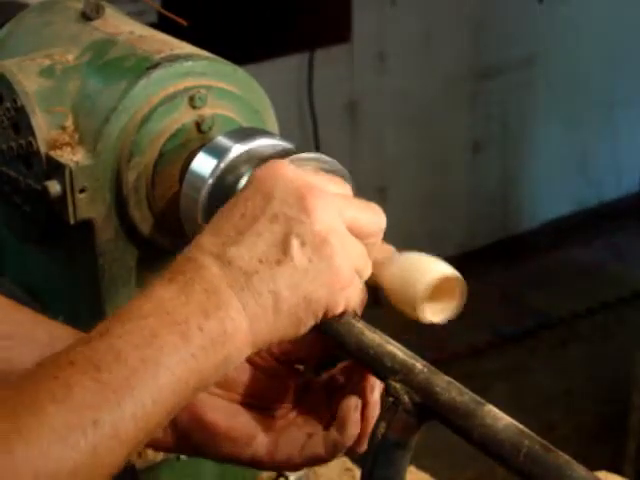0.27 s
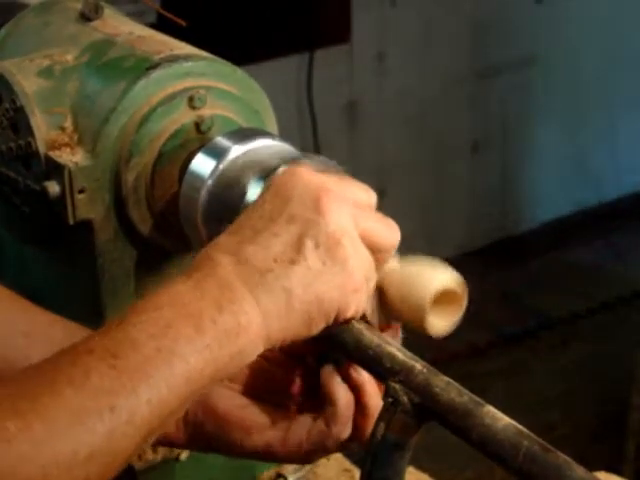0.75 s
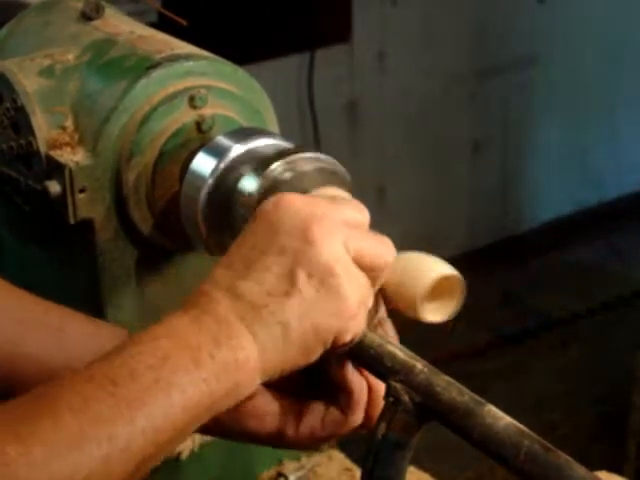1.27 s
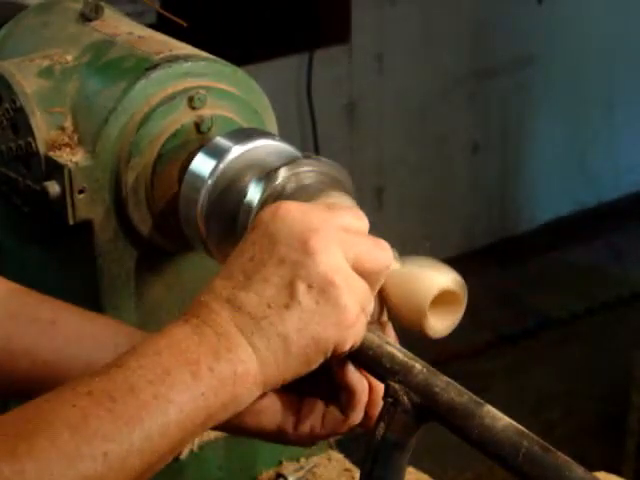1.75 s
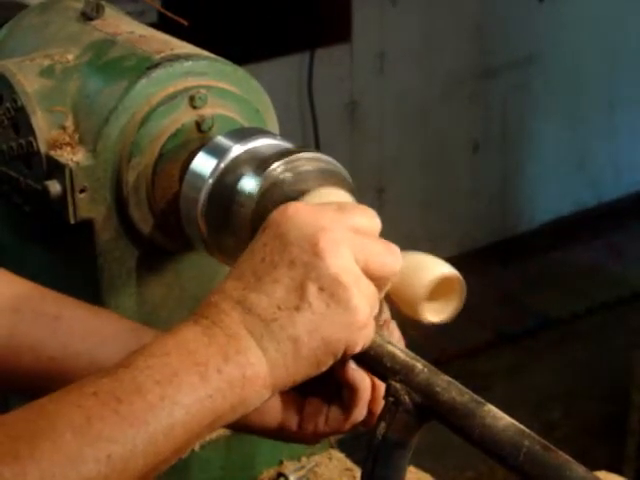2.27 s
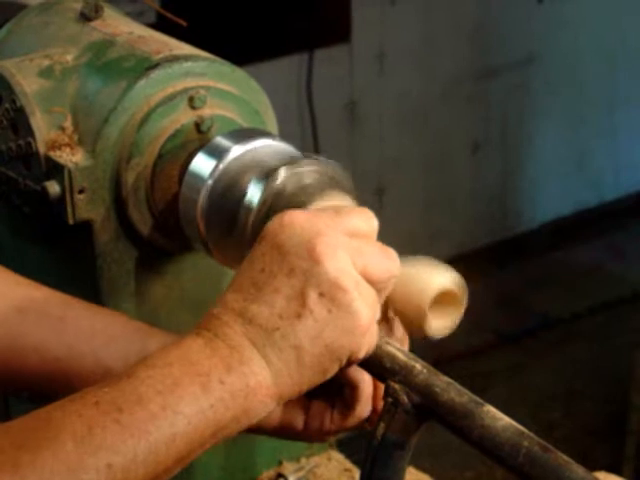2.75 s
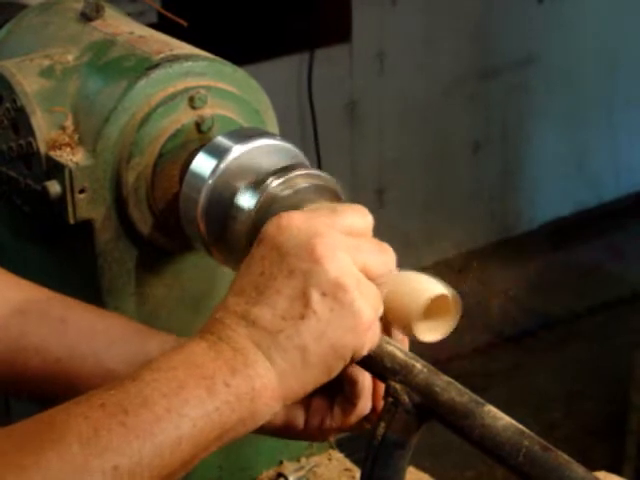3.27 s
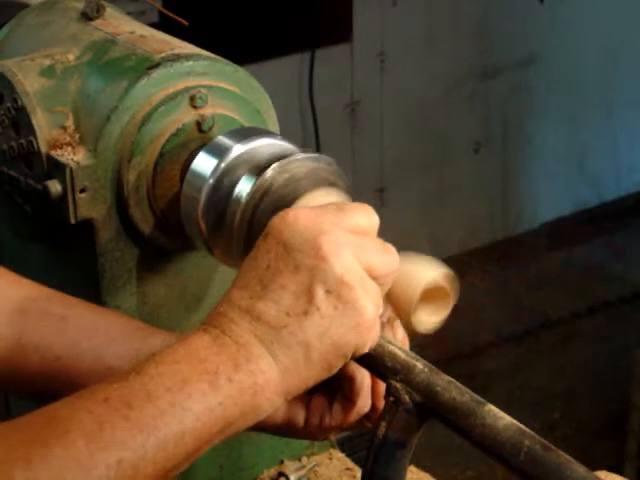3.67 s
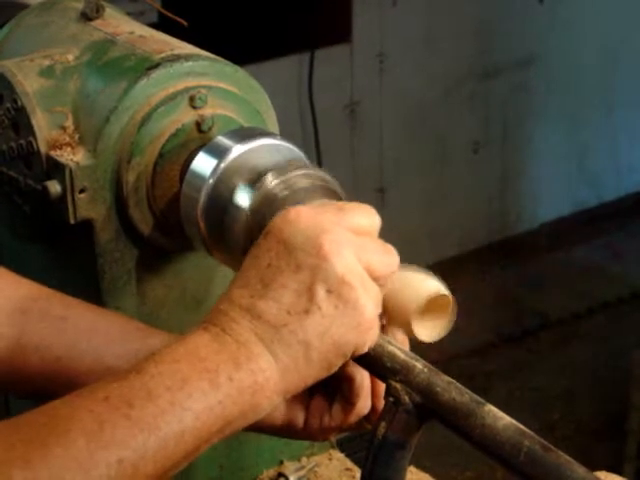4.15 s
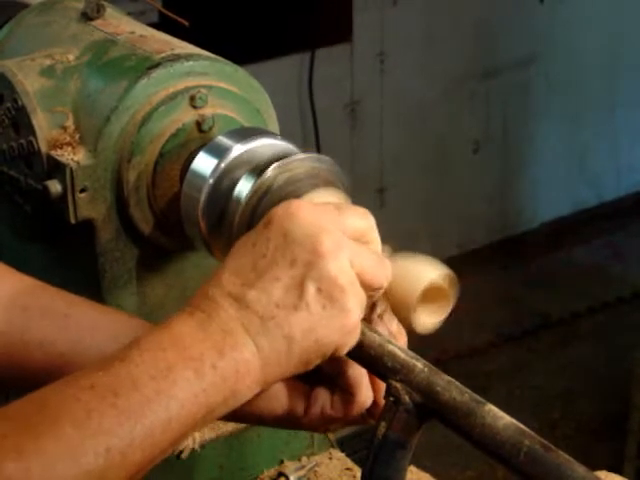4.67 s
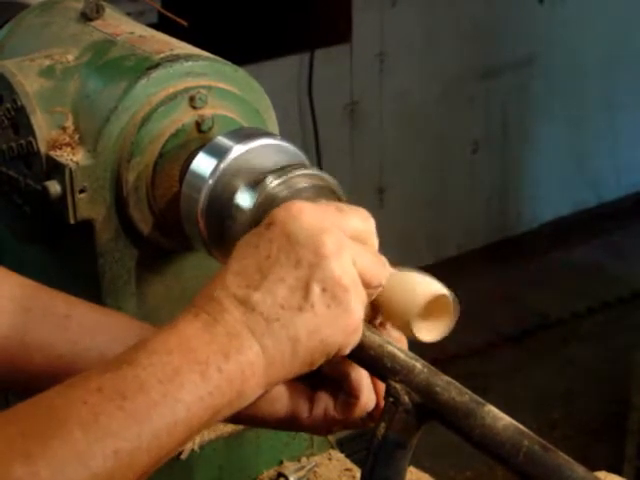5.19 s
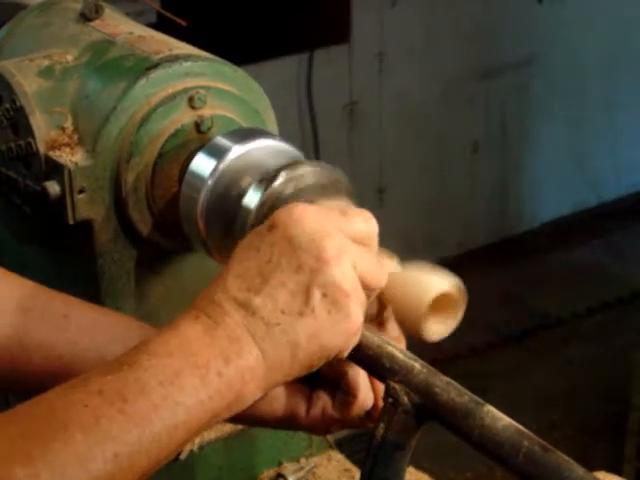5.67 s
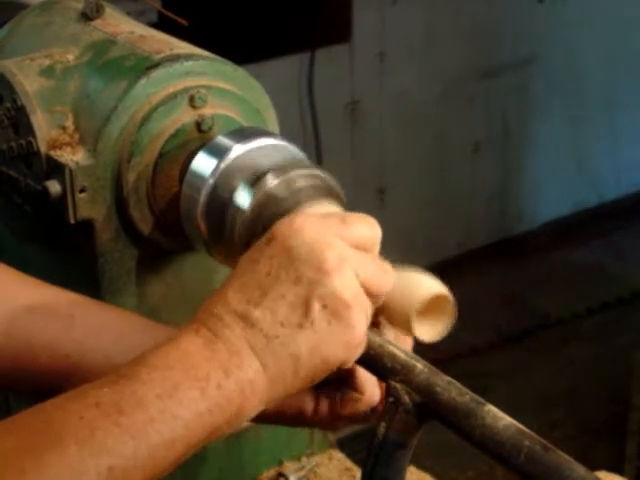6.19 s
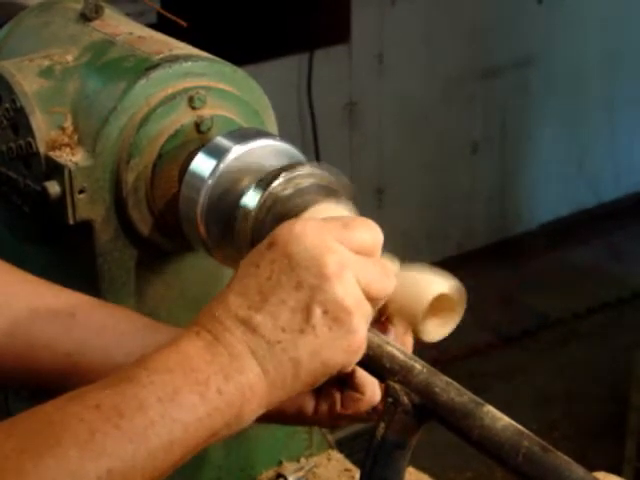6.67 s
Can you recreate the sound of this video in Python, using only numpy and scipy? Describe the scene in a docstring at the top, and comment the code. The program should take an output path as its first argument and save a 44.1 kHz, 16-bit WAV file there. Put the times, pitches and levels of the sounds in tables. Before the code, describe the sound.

Close up in a small workshop, sandpaper is held to a small hollow wooden piece turning slightly off-centre. After light first scuffs, coarse scratching quickly becomes a continuous hissing rasp fluttering with every turn. Pressure shifts its brightness; a woody high ring and thin squeaks come and go over the lathe's steady low rumble, unsteady hum and faint high whine.

```python
"""A workshop: sandpaper is held against a small wooden goblet spinning on a lathe.
The wood runs slightly out of true, so the paper bites once a turn: random grain impacts, filtered and
throbbing at spindle speed, give rasp and hiss; they drive resonances of the wood, which also sings and squeaks.
Under it the lathe rumbles (filtered noise, frame resonances), hums and whines (unsteady sines)."""
import sys
import numpy as np
from scipy import signal
from scipy.fft import rfft, irfft, next_fast_len
from scipy.io import wavfile
from scipy.ndimage import uniform_filter1d, map_coordinates

SR = 44100
rng = np.random.default_rng(int(sys.argv[2]) if len(sys.argv) > 2 else 0)


def dump(signal):
    """Clip the signal to [-1, 1] and save it as 16-bit WAV at the path in sys.argv[1]."""
    limited = np.clip(np.atleast_2d(signal).T, -1, 1)
    pcm = np.round(limited * 32767).astype(np.int16)
    wavfile.write(sys.argv[1], SR, pcm)


N = 305613
TIME = np.arange(N) / SR
SPINDLE_HZ = 15.5


def amp(db):
    """Decibels to gain."""
    return 10 ** (np.asarray(db) / 20)


def unit(x):
    """x at rms 1."""
    return x / np.sqrt(np.mean(x ** 2) + 1e-20)


def along(points, hz):
    """Interpolate (Hz, value) points on a log axis."""
    f, v = np.transpose(points)
    return np.interp(np.log(hz + 1), np.log(f + 1), v)


def curves(rows):
    """One value per sample for each column after the time."""
    s, *cols = np.transpose(rows)
    return [np.interp(TIME, s, c) for c in cols]


def wobble(rate_hz):
    """Smooth random curve, rate_hz knots a second."""
    knots = rng.standard_normal(int(N * rate_hz / SR) + 4)
    return map_coordinates(knots, [TIME * rate_hz])


def filtered(x, response):
    """x times a complex response of frequency."""
    m = next_fast_len(N + SR // 2)
    return irfft(rfft(x, m) * response(np.fft.rfftfreq(m, 1 / SR)), m)[:N]


def coloured(x, spectrum):
    """x given a spectrum, at rms 1."""
    return unit(filtered(x, lambda hz: amp(along(spectrum, hz))))


def ringing(x, modes):
    """x through parallel band-pass resonances, at rms 1."""
    def response(f):
        return sum(amp(db) * 1j * f * w / (c * c - f * f + 1j * f * w) for c, w, db in modes)
    return unit(filtered(x, response))


def grit(rate_hz, spread_db):
    """Random impacts of abrasive grains, of uneven size, at rms 1."""
    hit = rng.random(N) < rate_hz / SR
    return unit(hit * rng.standard_normal(N) * amp(spread_db * rng.standard_normal(N)))


def throb(db):
    """Gain that follows db and keeps a mean power of 1 over each turn."""
    gain = amp(db)
    power = uniform_filter1d(gain ** 2, int(SR / SPINDLE_HZ))
    return gain / np.sqrt(np.abs(power) + 1e-12)


def bite(turns, arc, dome, rise=.04, fall=.11):
    """Relative pressure, near 0 at the high spot and -1 opposite; the paper catches faster than it lets go."""
    angle = (turns + .5) % 1 - .5
    catch = (1 + np.tanh((angle + arc) / rise)) / 2
    release = (1 - np.tanh((angle - arc - fall / 2) / fall)) / 2
    return (1 - dome) * (catch * release - 1) - dome * np.sin(np.pi * angle) ** 2


def surface(turns, count):
    """Roughness of count patches a turn: it comes round again and changes slowly as the hand moves."""
    patches = rng.standard_normal((count, 40))
    return unit(map_coordinates(patches, [turns % 1 * count, TIME * 3], order=1, mode="grid-wrap"))


def spinning(x, modes, turns, depth_db):
    """x rings modes whose two lobes turn with the wood and sweep past the microphone; rms 1."""
    total = 0
    for hz, width_hz, db, angle in modes:
        lobes = amp(depth_db * np.cos(2 * np.pi * 2 * (turns - angle)))
        mode = unit(lobes * ringing(x, [(hz, width_hz, 0)]))
        total = total + amp(db) * np.sqrt(width_hz) * mode
    return unit(total)


def patchy(x, depth_db):
    """Random slow gain in each patch of time and frequency: the noise changes colour unevenly; rms 1."""
    z = signal.stft(x, nperseg=256)[2]
    field = uniform_filter1d(rng.standard_normal(z.shape), size=4, axis=0)
    field = uniform_filter1d(field, size=7, axis=1)
    return unit(signal.istft(z * amp(depth_db * unit(field)), nperseg=256)[1][:N])


# bearings, belt and motor fan: (frequency [Hz], relative level [dB per Hz])
RUMBLE_SPECTRUM = [(20, -37), (38, -21), (50, -21.5), (70, -22), (115, -2.5), (155, -5.5), (200, -4),
                   (250, -3.5), (300, -5.5), (450, -5), (600, -8.5), (1000, -12.5), (2000, -14),
                   (2800, -19.5), (4500, -24), (7000, -37.5), (10000, -18)]
RUMBLE_DB = -35  # mean level


def rumble():
    """Bearings, belt and fan: coloured noise at a slightly unsteady level."""
    return amp(RUMBLE_DB + 1.16 * wobble(13)) * coloured(rng.standard_normal(N), RUMBLE_SPECTRUM)


# lathe frame resonances: (frequency [Hz], width [Hz], relative level [dB])
FRAME_MODES = [(526.3, 33, -3.5), (722, 20, -8.5), (941, 32, -9.5), (1373, 35, -11.5)]
# belt guard resonance: (frequency [Hz], width [Hz], relative level [dB])
GUARD_MODE = [(212.2, 58, 0)]
# machine shake: (time [s], frame level [dB], belt guard drone level [dB])
SHAKE_LEVELS = [(0, -47, -45), (2.4, -43, -46.5), (4, -42.5, -47), (6.93, -43, -50.5)]


def shaking():
    """Noise rings the frame, pulsing once a turn with unbalance, and drones in the belt guard."""
    frame_db, guard_db = curves(SHAKE_LEVELS)
    unbalance_db = 3.1 * np.cos(2 * np.pi * SPINDLE_HZ * TIME - 1.1)
    frame = ringing(rng.standard_normal(N) * amp(unbalance_db), FRAME_MODES)
    guard = ringing(ringing(rng.standard_normal(N), GUARD_MODE), GUARD_MODE)
    return amp(frame_db) * frame + amp(guard_db) * guard


def line(hz, db, drift_rad):
    """Sine at rms level db, slightly unsteady in level and phase."""
    phase = 2 * np.pi * (hz * TIME + rng.random()) + drift_rad * wobble(4.12)
    return np.sqrt(2) * amp(db + wobble(3.1)) * np.sin(phase)


# fluttering lines, low to high: (frequency [Hz] of each)
HUM_LINES_HZ = (529.3, 637, 937)
# (time [s], low line level [dB], middle line level [dB], high line level [dB])
HUM_LEVELS = [(0, -62, -67, -65), (2, -62.5, -53, -64), (3.2, -44.5, -60, -52), (4, -53, -54, -69),
              (4.5, -46, -56, -62), (6.93, -46, -49.5, -62)]
HUM_FLUTTER_DB = 3


def hum():
    """Three lines with quick random flutter; phase drift grows with frequency."""
    total = 0
    for hz, db in zip(HUM_LINES_HZ, curves(HUM_LEVELS)):
        flutter = unit(amp(HUM_FLUTTER_DB * wobble(30)))
        total = total + flutter * line(hz, db, drift_rad=0.54 * hz / HUM_LINES_HZ[0])
    return total


# spindle lines: (multiple of spindle speed [1], level [dB])
SPINDLE_ORDERS = [(4, -67.5), (5, -67.5), (6, -57), (7, -72), (12, -49.5), (16, -52.5)]
# motor hum and speed control whine: (frequency [Hz], level [dB])
MOTOR_TONES = [(118.4, -59), (9900, -47.5)]


def spindle_and_motor():
    """Unsteady sines at multiples of spindle speed, plus motor hum and speed control whine."""
    spindle = sum(line(round(k) * SPINDLE_HZ, db, drift_rad=1.0) for k, db in SPINDLE_ORDERS)
    motor = sum(line(hz, db, drift_rad=.25) for hz, db in MOTOR_TONES)
    return spindle + motor


def lathe():
    """Sum of rumble, frame and guard shake, hum, spindle and motor lines."""
    return rumble() + shaking() + hum() + spindle_and_motor()


# paper first grazes the rim: (time [s], length [s], frequency [Hz], gain [dB])
FIRST_GRAZE = (.24, .02, 4000, -43)


def graze():
    """First light touch: one short scrape of grit through a narrow resonance."""
    s, length_s, hz, db = FIRST_GRAZE
    swell = np.exp(-((TIME - s) / length_s) ** 2)
    return amp(db) * swell * ringing(grit(rate_hz=4500, spread_db=3), [(hz, 160, 0)])


# room decay: (frequency [Hz], t60 [s])
ROOM_DECAY = [(200, 0.26), (2000, 0.25), (10000, 0.005)]


def workshop(x):
    """The walls' answer: a delayed noise tail in which each frequency dies at its own speed."""
    hz, t, z = signal.stft(rng.standard_normal(SR // 2), SR, nperseg=256)
    decay = amp(-60 * t / along(ROOM_DECAY, hz)[:, None])
    tail = signal.istft(z * decay, SR, nperseg=256)[1]
    delayed = np.pad(tail, (SR // 250, 0))  # 4 ms
    return signal.fftconvolve(x, delayed / np.linalg.norm(tail))[:N]


# fine grit hiss: (frequency [Hz], relative level [dB per Hz])
HISS_SPECTRUM = [(1500, -62), (3500, -34.5), (5000, -15), (5800, -22.5), (6500, 13.5), (7200, 15.5),
                 (8000, 14.5), (8700, 15), (9600, 17.5), (10500, 1.5)]


def fine_grit():
    """Dense impacts of fine grains, coloured, with unevenly changing colour; rms 1."""
    return patchy(coloured(grit(rate_hz=32000, spread_db=5.0), HISS_SPECTRUM), depth_db=2.5)


# coarse rasp on the thick foot: (frequency [Hz], relative level [dB per Hz])
FOOT_SPECTRUM = [(300, -30.5), (1200, -9), (1700, -16), (2400, -4), (3000, 1.5), (4100, 2.5), (5400, 0),
                 (6200, -0.5), (7500, -6), (10000, -29.5)]
# paper pinched against the foot: (frequency [Hz], width [Hz], relative level [dB])
PAPER_MODES = [(2420, 80, -5), (2830, 70, -5), (3430, 110, 0), (3980, 130, 0), (4430, 90, -3),
               (5050, 150, -3), (5740, 190, -5)]
# foot rasp as the grip shifts: (time [s], level [dB], pitch ratio of paper resonances [1])
GRIP_SHIFTS = [(.5, -27.5, 1), (.68, -24.8, 1), (1.03, -26.3, 1), (1.22, -30.5, .98), (1.3, -26.5, .97),
               (1.45, -25, 1.02), (1.6, -28.5, 1)]
PAPER_DB, PAPER_WANDER = -1, .014  # level against plain rasp; pitch wander from turn to turn (share)


def foot_rasp(scrape):
    """Broad rasp plus paper resonances, resampled so their pitch wanders from turn to turn; rms 1."""
    pitch = curves(GRIP_SHIFTS)[1] * (1 + PAPER_WANDER * wobble(SPINDLE_HZ))
    paper = ringing(grit(rate_hz=5500, spread_db=3.0), PAPER_MODES)
    paper = map_coordinates(paper, [np.cumsum(pitch)], mode="grid-wrap")
    return unit(coloured(scrape, FOOT_SPECTRUM) + amp(PAPER_DB) * unit(paper))


# separate first touches of the high spot: (time [s], length [s], gain [dB])
FIRST_TOUCHES = [(.246, .02, -38), (.309, .02, -35), (.37, .02, -29), (.437, .027, -31)]
TOUCH_RISE_S, TOUCH_FALL_S, TOUCH_HISS_DB = .005, .011, -5  # hiss against rasp


def touches(foot, fine):
    """The high spot brushes the paper: each touch starts fast, holds unevenly and dies quickly."""
    gain = 0
    for s, length_s, db in FIRST_TOUCHES:
        t = TIME - s
        rise = np.clip(t / TOUCH_RISE_S, 0, 1)
        fall = np.exp(-np.maximum(t - length_s, 0) / TOUCH_FALL_S)
        gain = gain + amp(db) * rise * fall
    judder = amp(1.2 * wobble(250))
    return judder * gain * patchy(foot + amp(TOUCH_HISS_DB) * fine, depth_db=0.5)


# finger pressure, heard in the hiss: (time [s], level [dB])
FINGER_PRESS = [(.55, -4), (.68, -2.5), (.9, -5.5), (1.1, -1.5), (1.22, -4.5), (1.3, -1.5), (1.42, -2),
                (1.55, -3.5), (2.25, -2), (2.7, -3), (2.9, 1), (3.03, 1.5), (3.12, -0.5), (3.33, -3),
                (3.5, -1.5), (3.7, -2), (4.2, -0.7), (4.43, -5), (5.05, -4.5), (5.3, -3), (5.75, -4),
                (6.1, -3.5), (6.93, -2)]
# broad modes of the cup's thin wall: (frequency [Hz], width [Hz], relative level [dB per Hz], angle [turns])
CUP_MODES = [(4930, 170, 0, .02), (5780, 200, 0, -.27), (6850, 240, -2.5, -.13), (7400, 260, -5.5, .1),
             (8550, 380, -4.5, .2), (9300, 500, -4, -.15)]
HISS_DB = -26.5  # at 0 dB finger pressure


def hiss(fine, turns, load_db, fibres_db):
    """Fine grit plus the thin cup wall it rings; of all layers it depends most on pressure."""
    press_db = curves(FINGER_PRESS)[0] + .3 * wobble(12)
    cup = spinning(grit(rate_hz=14000, spread_db=1.2), CUP_MODES, turns, depth_db=3.5)
    rough_db = fibres_db + .4 * surface(turns, count=12) + wobble(110)
    return amp(HISS_DB + press_db) * unit(fine + amp(-5) * cup) * throb(1.45 * load_db + rough_db)


# coarse rasp on the stem: (frequency [Hz], relative level [dB per Hz])
STEM_SPECTRUM = [(300, -18.5), (1200, -7.5), (1700, -7), (2300, 1), (2900, -2), (3600, -2), (4200, -4),
                 (5200, 0.5), (6200, 0.5), (10000, -48)]
STEM_DB = -32  # the stem gives way and so keeps its rasp level


def rasp(scrape, foot, place, drag_db, fibres_db):
    """Coarse scraping that crossfades from foot to stem; the stem's throbs less."""
    level_db = (1 - place) * curves(GRIP_SHIFTS)[0] + place * STEM_DB
    noise = patchy((1 - place) * foot + place * coloured(scrape, STEM_SPECTRUM), depth_db=2.5)
    rough_db = fibres_db + (1.4 - .5 * place) * wobble(120)
    return amp(level_db + .4 * wobble(20)) * noise * throb((.8 - .48 * place) * drag_db + rough_db)


EDGE_TURNS, EDGE_SPREAD_TURNS = .195, .115  # angle of catch and release from the centre; spread
EDGE_FLOOR, EDGE_LEAD_TURNS = .42, .05  # drive in between (share); both swells lead the bite


def edges(turns):
    """Drive of the wood over a turn: one swell as the paper catches, one as it lets go; rms 1."""
    angle = (turns + EDGE_LEAD_TURNS + .5) % 1 - .5
    return unit(EDGE_FLOOR + np.exp(-((np.abs(angle) - EDGE_TURNS) / EDGE_SPREAD_TURNS) ** 2))


# goblet bending modes; angle is where a lobe faces the microphone:
# (frequency [Hz], width [Hz], relative level [dB per Hz], angle [turns])
WOOD_MODES = [(1844, 21.6, -2.5, -0.52), (1976, 63, -4.5, -0.19), (2066, 42, -2, -0.54),
              (2383, 56, -10, 0.42), (2612, 30, -9.5, -0.27), (2822, 63, -8.5, 0.018),
              (3026, 100, -15.5, 0.043), (3320, 25, -9, 0.07), (4057, 95, -11.5, -0.12)]
# wood ring: (time [s], level [dB])
RING_LEVELS = [(.65, -31), (.85, -32), (1.06, -36), (1.22, -30.5), (1.38, -33), (1.74, -35), (1.88, -29),
               (2.33, -31), (2.66, -38.5), (2.85, -31), (3.2, -34.5), (3.5, -31.5), (4.2, -32), (4.68, -29),
               (5.05, -32.5), (5.42, -28), (5.9, -35), (6.93, -34)]


def wood_ring(turns, load_db):
    """Grit rings the goblet's bending modes, most at the edges of the bite; pressure matters least here."""
    bending = grit(rate_hz=7000, spread_db=0.3) * edges(turns) * throb(0.054 * load_db)
    return amp(curves(RING_LEVELS)[0]) * spinning(bending, WOOD_MODES, turns, depth_db=1.5)


# paper sticks and slips in step with the strongest mode: (middle [s], length [s], frequency [Hz], gain [dB])
SINGING_SPELLS = [(2.86, .16, 2075, -38), (3.16, .2, 2070, -39), (3.52, .24, 2072, -36.5),
                  (5.42, .42, 2055, -35)]


def singing(turns):
    """The wood's strongest mode swells to a nearly pure tone, pushed twice a turn."""
    drift_rad = .45 * wobble(60)
    tone = 0
    for s, length_s, hz, db in SINGING_SPELLS:
        swell = np.exp(-(2 * (TIME - s) / length_s) ** 4)
        tone = tone + amp(db) * swell * np.sin(2 * np.pi * hz * TIME + drift_rad)
    return np.sqrt(2) * tone * unit(np.sqrt(edges(turns)) * amp(3 * wobble(24)))


SQUEAK_HZ, SQUEAK_DB = 2375, -39.5
SQUEAK_FROM_S, SQUEAK_TO_S = 3.45, 4.2
SQUEAK_RISE_DB_PER_S, SQUEAK_FALL_DB_PER_S = 100, 40


def squeak(turns):
    """The paper slips off the low side once a turn: short bursts of an unsteady sine, for a spell."""
    before_db = SQUEAK_RISE_DB_PER_S * np.maximum(SQUEAK_FROM_S - TIME, 0)
    after_db = SQUEAK_FALL_DB_PER_S * np.maximum(TIME - SQUEAK_TO_S, 0)
    level_db = SQUEAK_DB - before_db - after_db + 1.2 * wobble(16)
    slip = np.exp(-(np.cos(np.pi * turns) / .3) ** 2)
    phase = 2 * np.pi * SQUEAK_HZ * TIME + .3 * wobble(120) + .9 * wobble(30)
    return amp(level_db) * unit(slip) * np.sqrt(2) * np.sin(phase)


# hand on the wood: (time [s], lag of the high spot [turns], pressure swing over a turn [dB])
HAND_MOTION = [(.39, 0, 24), (.9, .04, 18), (1.2, .035, 17), (1.35, .01, 23), (1.6, .03, 19),
               (2.1, .04, 16), (3.0, .06, 17), (4.1, .085, 15), (4.55, .11, 10), (5.3, .075, 9),
               (6.05, .19, 12), (6.93, .22, 12)]
# place of the paper: (time [s], place [0 foot, 1 stem])
PAPER_SLIDE = [(1.45, 0.12), (1.9, 0.83), (4.9, 0.86), (6.93, 0.65)]
TOUCH_S, SETTLE_S = .445, .09  # paper stays on the wood; time to bed in
ARC_TURNS, ARC_POWER = .31, .42  # bedded-in half arc of contact; how it widens with touch
WRAP_TURNS = .055  # extra half arc of rasp on the stem
UNEVEN_FOOT, UNEVEN_STEM = .3, .12  # bite depth variation (share)


def sanding():
    """Grit scrapes the passing high spot and rings the goblet, while the paper sings and squeaks on it."""
    lag, swing_db = curves(HAND_MOTION)
    place = np.clip(curves(PAPER_SLIDE)[0], 0, 1)
    turns = SPINDLE_HZ * TIME - lag + .012 * wobble(14)
    # bedding in: louder, wider contact
    touch = np.clip((TIME - TOUCH_S) / SETTLE_S, 0, 1)
    arc = ARC_TURNS * touch ** ARC_POWER + .025 * wobble(25)
    # random variation of bite depth, larger on the foot than on the stem
    uneven = (1 - place) * UNEVEN_FOOT + place * UNEVEN_STEM
    depth_db = swing_db * (1 + uneven * wobble(16))
    load_db = depth_db * bite(turns, arc, dome=.2 - .1 * place)
    # the paper wraps round the stem, so its rasp lasts for most of the turn
    drag_db = depth_db * bite(turns, arc + WRAP_TURNS * place, dome=.3 - .2 * place)
    fibres_db = .4 * surface(turns, count=14) + .6 * wobble(290)
    fine = fine_grit()
    scrape = grit(rate_hz=20000, spread_db=2.0)
    foot = foot_rasp(scrape)
    rubbing = hiss(fine, turns, load_db, fibres_db)
    rubbing = rubbing + rasp(scrape, foot, place, drag_db, fibres_db)
    rubbing = rubbing + wood_ring(turns, load_db)
    return touches(foot, fine) + touch * rubbing + singing(turns) + squeak(turns)


def scene():
    """The paper close by, the room behind it, the machine under both."""
    paper = sanding() + graze()
    return (paper + amp(-18.0) * workshop(paper) + lathe())[None]


TOP_HZ = 10050


def record(dry):
    """Band limit: a very steep low-pass at TOP_HZ."""
    return filtered(dry[0], lambda hz: 1 / np.sqrt(1 + (hz / TOP_HZ) ** 400))[None]


dry = scene()
out = record(dry)
dump(out)
```